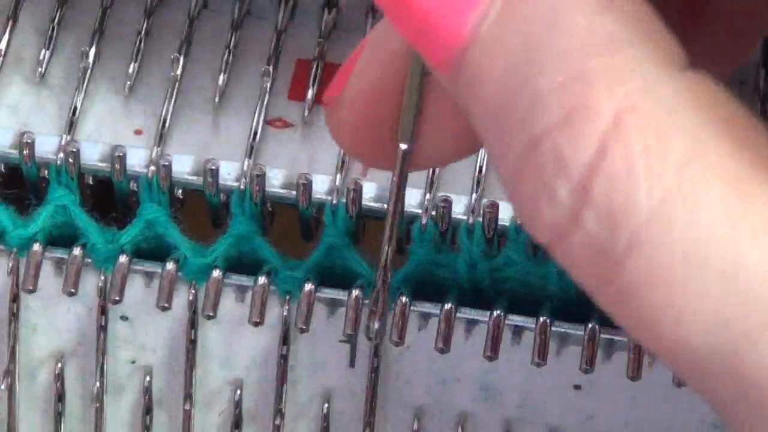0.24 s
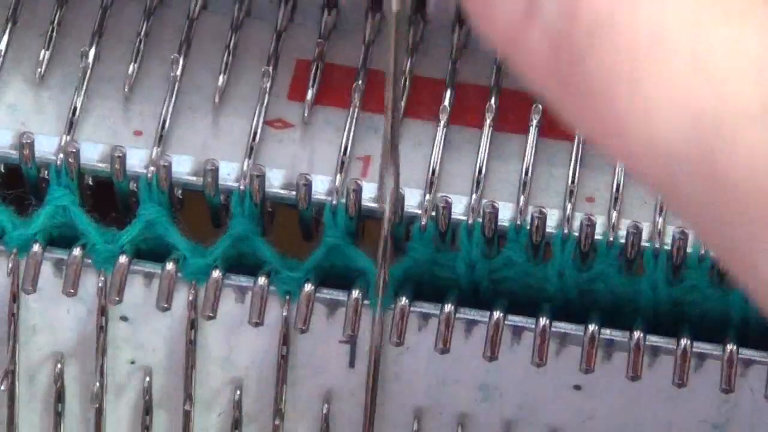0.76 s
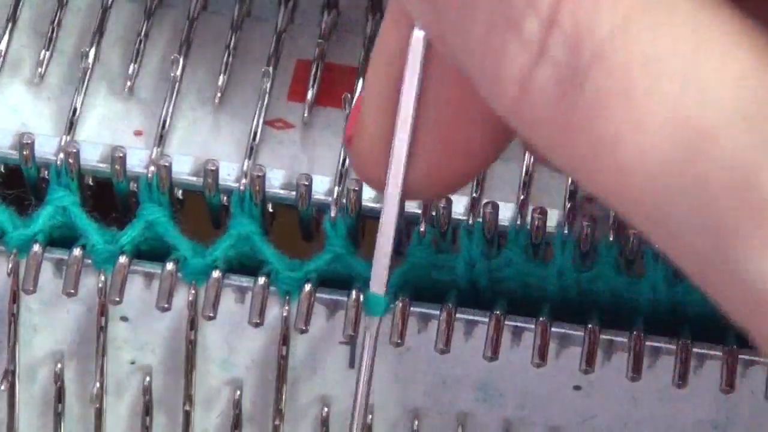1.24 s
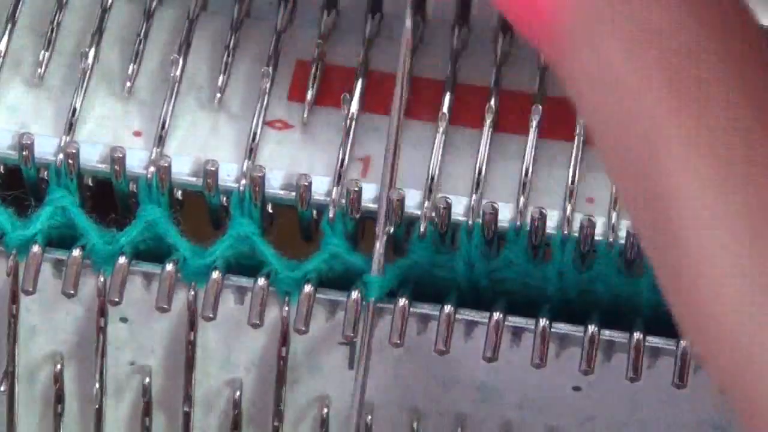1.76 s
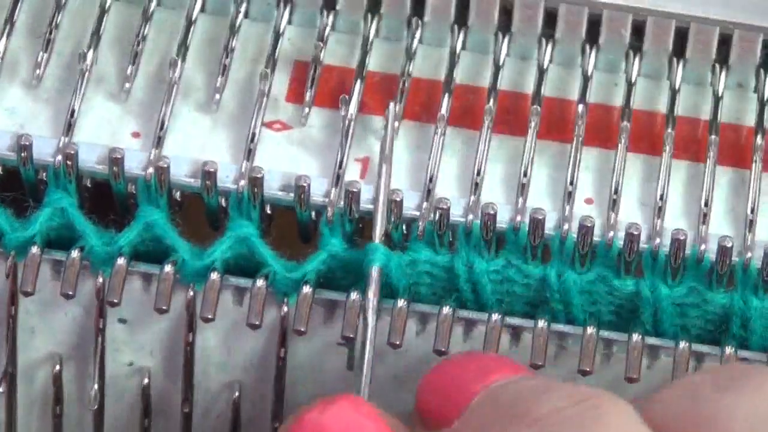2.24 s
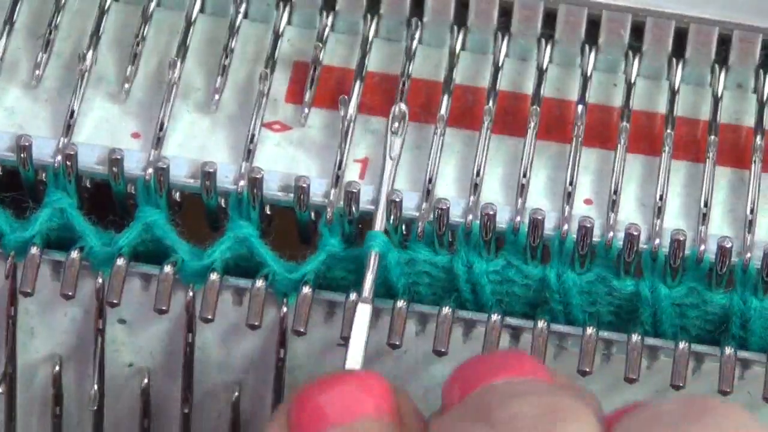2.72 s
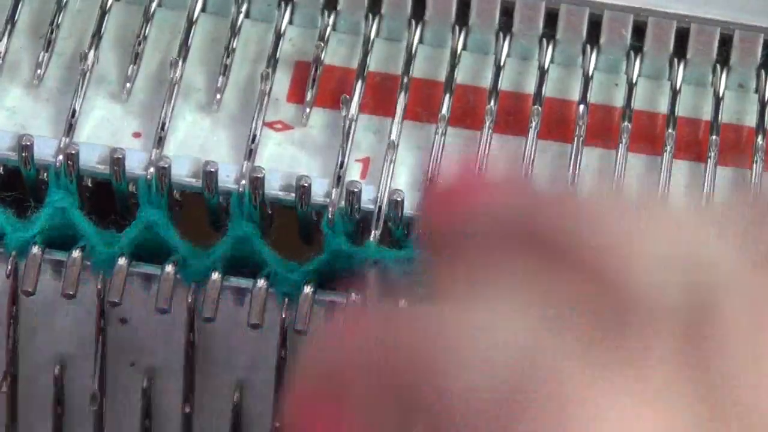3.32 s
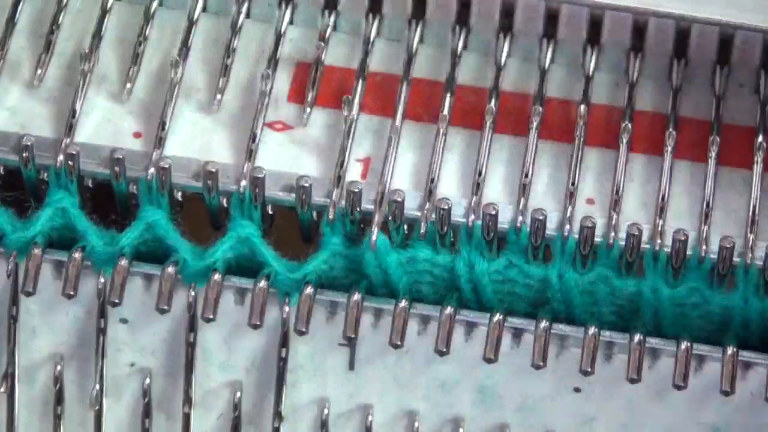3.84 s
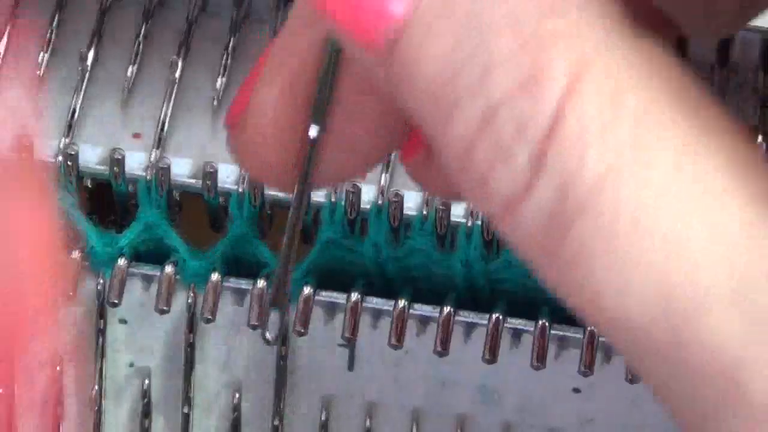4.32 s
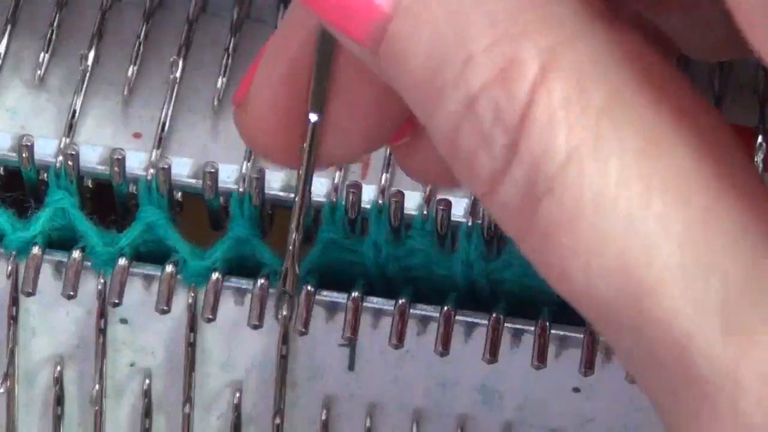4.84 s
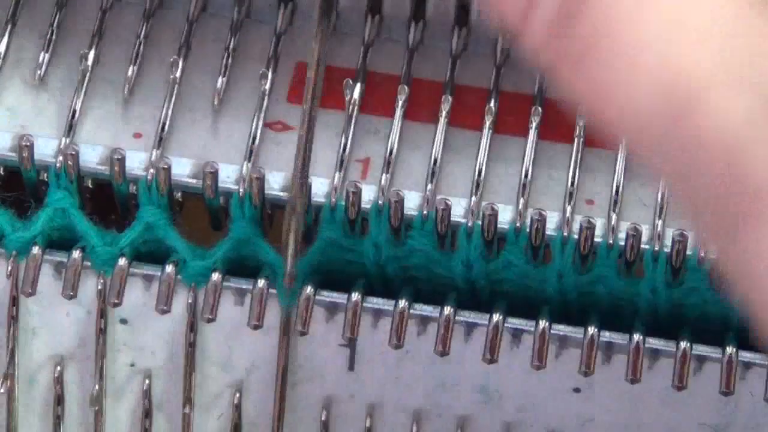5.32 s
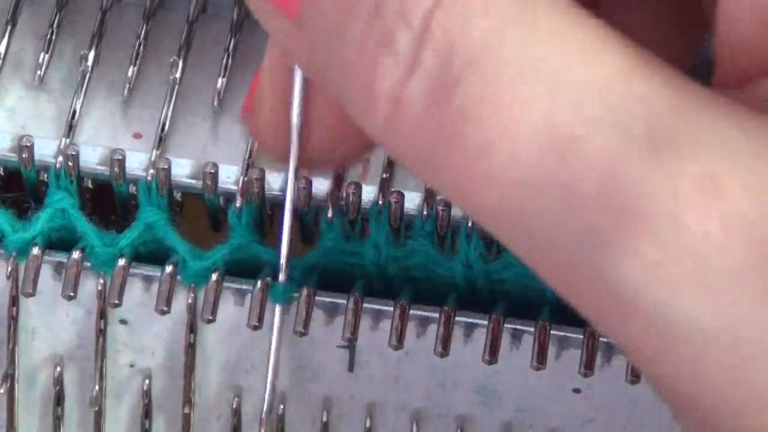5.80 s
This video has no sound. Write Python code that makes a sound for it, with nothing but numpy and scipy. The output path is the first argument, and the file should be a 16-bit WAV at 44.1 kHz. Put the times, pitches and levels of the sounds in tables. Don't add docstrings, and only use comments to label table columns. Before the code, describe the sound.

Close, dry steel clicks with brief ringing and dull plate knocks, scattered unevenly above a soft camera hum, rapid motor flutter and hiss.

```python
import sys
import numpy as np
from scipy import signal
from scipy.fft import rfft, irfft
from scipy.io import wavfile
from scipy.ndimage import uniform_filter1d

SR = 44100
rng = np.random.default_rng(int(sys.argv[2]) if len(sys.argv) > 2 else 0)


def elevation(decibels):
    levels = np.asarray(decibels, float)
    return 10 ** (levels / 20)


def inscribe(sig):
    pcm = np.round(np.clip(np.atleast_2d(sig).T, -1, 1) * 32767)
    wavfile.write(sys.argv[1], SR, pcm.astype(np.int16))


N = 267246

# time in seconds, rumble in dB, casing hum in dB, sliding in dB.
DRIFT = [(0.0, -63, -58, -66), (0.42, -66, -56, -65), (0.61, -58, -56, -56), (0.81, -65, -54, -56),
         (0.96, -64, -56, -58), (1.2, -87, -57.5, -69), (1.42, -56, -50.5, -62), (1.6, -59.5, -54, -65),
         (1.87, -63, -55.5, -69), (2.58, -70, -51.5, -71), (2.79, -85, -59, -69.5), (3.14, -68, -53.5, -75),
         (3.31, -85, -59, -75), (3.51, -67, -59, -64), (3.66, -57, -52.5, -67), (4.12, -67.5, -52.5, -66),
         (4.46, -56, -54, -64), (4.57, -67, -54.5, -69), (4.79, -88, -54.5, -73), (5.08, -71, -54, -62),
         (5.26, -60.5, -52, -57), (5.7, -59, -51.5, -64), (5.96, -65, -57.5, -63), (6.06, -75, -53, -69)]


def on_log(table, hz):
    table_hz, value = np.transpose(table)
    return np.interp(np.log(np.maximum(hz, 1)), np.log(table_hz), value)


def colour(x, table):
    gain = elevation(on_log(table, np.fft.rfftfreq(len(x), 1 / SR)))
    return irfft(rfft(x) * gain, len(x))


def band(hz, width_hz):
    f = np.fft.rfftfreq(N, 1 / SR)
    resonance = 1 / (1 + (2 * (f - hz) / width_hz) ** 2)
    y = irfft(rfft(rng.standard_normal(N)) * resonance, N)
    return y / y.std()


def walk(rate_hz):
    hold = int(SR / rate_hz)
    held = np.repeat(rng.standard_normal(N // hold + 1), hold)
    return 2.5 * uniform_filter1d(uniform_filter1d(held, hold), hold)[:N]


def drift_db(column):
    columns = np.transpose(DRIFT)
    return np.interp(np.arange(N) / SR, columns[0], columns[column])


def ring(modes, t):
    hz, db, t60_s = np.transpose(modes)[:, :, None]
    return (elevation(db) * np.sin(2 * np.pi * hz * t) * 1000 ** (-t / t60_s)).sum(axis=0)


def swell(t, rise_s):
    return 1 - np.exp(-t / rise_s)


def peak(x):
    return x / np.abs(x).max()


def burst(t, rise_s, t60_s, spectrum):
    lead = SR // 200
    x = rng.standard_normal(len(t)) * swell(t, rise_s) * 1000 ** (-t / t60_s)
    coloured = colour(np.pad(x, lead), spectrum)
    return peak(coloured[lead - 8:lead - 8 + len(t)])


def bump(hz, ratio):
    return [(hz / ratio ** 4, -40), (hz / ratio, -8), (hz, 0), (hz * ratio, -8), (hz * ratio ** 4, -40)]


def add(out, start_s, sound):
    i = int(start_s * SR)
    out[i:i + len(sound)] += sound[:N - i]


def casing_hum():
    # centre in Hz, width in Hz, mid in dB, side in dB.
    casing = [(49.4, 9.2, -71, -104), (302, 95, -78.5, -87), (667, 47, -68.5, -85),
              (896.7, 107, -59, -68.5), (1101, 89, -61.5, -68), (1170, 134, -65.5, -71),
              (1237, 45, -61, -88), (1430, 130, -69.5, -87), (1700, 140, -89, -79), (2100, 120, -72.5, -99)]
    hum_db = drift_db(2)
    out = np.zeros((2, N))
    for hz, width_hz, mid_db, side_db in casing:
        sway_db = 0.48 * (hum_db - hum_db.mean()) + 1.26 * walk(5.3)
        own = band(hz, width_hz)
        lean = 0.58 * np.sign(hz - 100)
        side = lean * own + 0.61 * band(hz, width_hz)
        out += elevation(sway_db) * np.array([elevation(mid_db) * own, elevation(side_db) * side])
    return out


def lens_motor():
    # mode in Hz, level in dB, t60 in seconds.
    motor = [(2580, -63.5, 0.074), (2860, -55.5, 0.035), (3360, -57.5, 0.033), (3870, -54.5, 0.026),
             (5120, -61, 0.069), (5350, -57.5, 0.043), (7810, -71, .3)]
    step_hz, first_s, return_db = 25, 0.0232, -7
    out = np.zeros((2, N))
    step = ring(motor, np.arange(SR // 12) / SR)
    for k in range(int(N / SR * step_hz * 2)):
        start_s = first_s + (k - 1) / step_hz / 2
        mid_db = 3.3 * rng.standard_normal() + return_db * (2 - k % 2)
        side_db = 2 + return_db * (4.5 - k % 2)
        add(out[0], start_s, step * elevation(mid_db))
        add(out[1], start_s, step * elevation(side_db))
    return out


def hiss():
    # frequency in Hz, level in dB per Hz.
    hiss_mid = [(30, -10), (60, -0.5), (150, 2), (500, 0.5), (1500, 4), (2400, -3.5), (4000, -4.5),
                (6000, -6), (7000, -10.5), (10000, -9), (13000, -12.5), (15700, -11), (16050, -14),
                (16300, -60)]
    # frequency in Hz, level in dB per Hz.
    hiss_side = [(30, 7), (150, -2), (500, -6.5), (1500, -13), (2200, -13), (4000, -29), (6000, -17),
                 (8000, -15.5), (10000, -28), (15500, -42.5)]
    noise = np.array([colour(rng.standard_normal(N), hiss_mid), colour(rng.standard_normal(N), hiss_side)])
    return noise / noise[0].std() * elevation(-56.5 + 0.5 * walk(3.93))


def rumble():
    return elevation(drift_db(1) - 4) * band(296, 270)


def sliding():
    return elevation(drift_db(3) - 8 + 2.0 * walk(40)) * band(8300, 7500)


def ticks():
    # start in seconds, peak in dB, latch ring in Hz, shank minus latch in dB,
    # shank ring in Hz, contact in ms.
    contacts = [(0.0644, -53, 7810, 2, 3820, 1.2), (0.116, -40.5, 10800, -14, 2390, 2),
                (0.225, -35, 11300, -5, 5700, 0.89), (0.2979, -31, 12300, -15, 3270, 0.8),
                (0.412, -41, 11900, -10, 4030, 1.8), (0.4234, -42, 11700, -14, 5340, 1.5),
                (0.4604, -34, 9400, -9, 4670, 2), (0.464, -32, 9880, -2.5, 5840, 1.2),
                (0.4687, -25, 10100, -19, 5790, 1.1), (0.4766, -36, 9960, -8, 3990, 1.4),
                (0.5084, -36, 9240, -17, 4020, 1.2), (0.5156, -38, 9700, -7, 3100, 1.2),
                (0.577, -39, 10700, -6, 4100, 1.2), (0.6005, -33.5, 9650, 6.5, 2870, 1.6),
                (0.6164, -39, 8400, -13, 2320, 0.82), (0.6434, -32.5, 7550, -4, 4800, 1.2),
                (0.6615, -16, 9650, -5, 3030, 1.4), (0.7444, -54, 9820, 1, 2870, 1.2),
                (0.7966, -40, 6540, -6, 5670, 2.2), (0.7987, -31, 11300, -24, 5580, 1.2),
                (0.8703, -16, 9600, -35, 4840, 1.65), (0.9239, -23.5, 9700, -1, 3020, 1.3),
                (0.9607, -31.5, 10100, -5, 4300, 1.4), (0.977, -34.5, 10500, -8, 2340, 1.1),
                (1.0094, -51, 8950, -10, 2220, 1.2), (1.044, -36.5, 9150, -9, 2980, 2.2),
                (1.1453, -45, 10200, -12, 2940, 1.2), (1.405, -8, 8280, -14, 4760, 1.07),
                (1.7404, -36.5, 11300, -21, 2320, 1.5), (2.053, -38, 10900, -25, 5120, 1.2),
                (2.089, -50, 11200, -8, 3410, 0.97), (2.1125, -29.5, 9400, -6, 2950, 1.2),
                (2.1284, -24.5, 9800, -7.5, 3130, 2.2), (2.38, -44, 10700, -20, 2830, 1.2),
                (2.4187, -34, 10400, -21, 3830, 1.1), (2.4934, -30.5, 11200, -13, 4000, 1.8),
                (2.5701, -49, 10200, -6, 2740, 1.2), (2.6798, -47, 11000, -13, 5130, 1.2),
                (2.7397, -49, 10600, -11, 2520, 1.3), (2.9133, -43.5, 9200, -21, 3590, 1.6),
                (2.9908, -47.5, 8860, 7, 3600, 1.8), (3.042, -38.5, 11700, 7.5, 2740, 1.25),
                (3.0467, -40, 10400, -3, 2940, 1), (3.107, -42, 10300, -8, 3180, 1.2),
                (3.1353, -33.5, 10200, -8, 3100, 1.8), (3.1892, -36, 11500, -16, 4520, 1.2),
                (3.2158, -30.5, 10100, -28, 4540, 2.5), (3.4685, -21, 10050, -6, 3700, 0.54),
                (3.4898, -41, 10200, -1.5, 4100, 1.4), (3.5289, -26.5, 7500, -7, 3700, 1.54),
                (3.5496, -43, 8230, -2, 2740, 1.3), (3.8417, -42, 11400, -10, 3330, 1.2),
                (3.9085, -39, 10500, -17, 3400, 1.2), (3.9394, -45, 9820, -7, 3800, 1.2),
                (4.014, -37.5, 11600, -22, 4480, 0.89), (4.133, -45, 8890, -3, 3310, 1.2),
                (4.48, -33, 11500, -26, 4790, 0.77), (4.6583, -29.5, 9430, -8, 3940, 1.4),
                (4.729, -25.5, 10900, -25, 4900, 0.86), (5.016, -30.5, 9300, -6, 3730, 1.26),
                (5.0794, -45, 9170, -8, 3370, 1.2), (5.1253, -25.5, 9500, 1, 2300, 0.91),
                (5.154, -27.5, 10800, 4.5, 4000, 0.57), (5.1661, -13.5, 9940, -4, 3055, 0.99),
                (5.309, -43.5, 10800, -4, 3800, 1.5), (5.3228, -33, 11600, -16, 3290, 1.2),
                (5.4047, -12, 10400, -10, 4850, 0.94), (5.435, -25, 12200, -16, 3330, 1.6),
                (5.451, -24, 9100, -4.5, 3140, 1.4), (5.491, -34, 11800, -8, 4380, 1.2),
                (5.5017, -35.5, 12000, -14, 4500, 1.2), (5.558, -39, 11700, -11, 3820, 1.5),
                (5.7177, -27, 9900, -6.5, 4470, 1.4), (5.7684, -47, 7330, -7, 2830, 1.3),
                (5.886, -45, 6660, 0, 4790, 1.6), (5.9379, -48, 10600, -6, 4030, 1.4)]
    # frequency in Hz, level in dB per Hz.
    crack_spectrum = [(1470, -32), (2500, -7.5), (3130, -13.5), (4330, 2), (6450, -2), (9770, -2),
                      (13700, -9.5), (15100, -9), (16800, -35)]
    out, t = np.zeros(N), np.arange(SR // 5) / SR
    for start_s, db, latch_hz, shank_db, shank_hz, contact_ms in contacts:
        contact_s = contact_ms / 1000
        crack = burst(t, contact_s / 4, 6 * contact_s, crack_spectrum)
        rattle = burst(t, 0.0013, 0.057, crack_spectrum)
        latch = burst(t, contact_s / 4, 9 * contact_s, bump(latch_hz, 1.12))
        shank = burst(t, contact_s / 4, 16 * contact_s, bump(shank_hz, 1.19))
        tick = elevation(-3) * crack + elevation(-12) * rattle + elevation(-5) * latch + elevation(shank_db) * shank
        add(out, start_s, elevation(db) * tick)
    return out


def needle_sings():
    # start in seconds, level in dB, mode in Hz, t60 in seconds.
    songs = [(.412, -54, 4050, .1), (.424, -48, 11900, 0.086), (.601, -36, 3110, 0.055),
             (0.873, -42, 10170, .15), (.924, -32, 3153, .08), (1.405, -32, 4876, 0.098),
             (1.404, -31, 4440, 0.14), (2.128, -38, 3144, 0.084), (2.497, -50, 4380, 0.21),
             (2.496, -42, 11600, 0.089), (3.043, -43, 2700, 0.057), (3.044, -47, 5970, 0.063),
             (3.136, -40.5, 3130, 0.064), (3.19, -48, 11800, 0.069), (3.217, -43, 11840, 0.077),
             (3.865, -54, 2870, .06), (5.403, -43.5, 4450, .2), (5.435, -39, 12100, 0.12),
             (5.436, -40, 9300, 0.07), (5.451, -39.5, 3170, 0.086), (5.491, -50.5, 11800, 0.19),
             (5.585, -51.5, 2900, .06)]
    out, t = np.zeros(N), np.arange(SR // 5) / SR
    for start_s, db, hz, t60_s in songs:
        pair = ring([(hz, db, t60_s), (hz * 1.015, db - 12, 0.84 * t60_s)], t)
        add(out, start_s, pair * swell(t, 0.0023))
    return out


def plate_knocks():
    # start in seconds, peak in dB, main ring in Hz, upper minus lower in dB, t60 in seconds.
    blows = [(0.465, -42, 892, 4.5, 0.2), (0.6, -34.5, 907, 4.5, 0.21), (0.661, -38.5, 962, 7, 0.16),
             (0.87, -45, 1174, -3, 0.18), (0.923, -31, 739, -6, 0.17), (1.044, -45.5, 1166, -0.5, 0.22),
             (1.405, -27, 1170, -4.5, 0.15), (2.127, -45.5, 720, 1.5, 0.18), (3.041, -45.5, 812, -13, 0.23),
             (3.466, -39.5, 690, 4.5, 0.26), (3.527, -42, 1180, 0, 0.16), (5.014, -41.5, 1170, 4, 0.23),
             (5.124, -30, 848, 0.5, 0.13), (5.165, -33, 958, 4.5, 0.15), (5.402, -45, 948, -7, 0.22),
             (5.451, -30, 739, -2.5, 0.17), (5.716, -44, 1267, -1, 0.37), (5.886, -43.5, 952, -9, 0.28)]
    # frequency in Hz, level in dB per Hz.
    plate_lower = [(88, -38), (150, -16), (551, -9), (742, 0.5), (818, -2), (991, -8), (1180, -0.5),
                   (1320, -19.5), (1500, -9.5), (1950, -51), (3300, -120)]
    # frequency in Hz, level in dB per Hz.
    plate_upper = [(900, -40), (1300, -7), (1600, 1), (2100, -6), (2600, -5), (3500, -27)]
    out, t = np.zeros(N), np.arange(SR // 2) / SR
    for start_s, db, hz, upper_db, t60_s in blows:
        main = ring([(hz, 0, t60_s), (hz * 1.07, -5, t60_s)], t) * swell(t, 0.0039)
        dense = burst(t, 0.0046, 1.07 * t60_s, plate_lower)
        upper = burst(t, 0.00022, 0.029, plate_upper)
        upper += elevation(-7.5) * burst(t, 0.0012, 0.18, plate_upper)
        add(out, start_s, elevation(db + 0.5) * (elevation(-9) * peak(main) + dense + elevation(upper_db + 1) * upper))
    return out


def table_thumps():
    # start in seconds, level in dB, mode in Hz, t60 in seconds.
    thumps = [
        (0.609, -57, 120.4, 0.34),
        (.94, -51.5, 104.6, .5),
        (1.42, -55, 111, .4),
        (3.52, -56, 110, 0.46),
        (5.161, -52, 159.8, 0.49),
        (5.47, -54.5, 106, 0.57),
    ]
    out, t = np.zeros(N), np.arange(SR // 2) / SR
    for start_s, db, hz, t60_s in thumps:
        add(out, start_s, ring([(hz, db, t60_s)], t) * swell(t, 0.015))
    return out


def room(x):
    # frequency in Hz, t60 in seconds.
    room_t60 = [(200, 0.8), (700, 0.2), (2000, .2), (5000, 0.21), (10000, .17), (16000, .12)]
    t, tail = np.arange(SR // 2) / SR, 0
    for hz in 150 * 2 ** np.arange(0, 7, 0.5):
        noise = np.array([band(hz, hz / 2)[:len(t)], band(hz, hz / 2)[:len(t)]])
        tail = tail + noise * np.sqrt(hz) * 1000 ** (-t / on_log(room_t60, hz))
    tail = tail * swell(t, 0.00087)
    tail /= np.sqrt((tail[0] ** 2).sum())
    return elevation(-13) * signal.fftconvolve(x[None], tail, axes=1)[:, :N]


def scene():
    # frequency in Hz, level in dB.
    ports = [(300, -17.5), (1000, -16.5), (2500, -19), (4000, -23), (8000, -11.5), (11000, -20.5),
             (16000, -22)]
    camera = casing_hum() + lens_motor() + hiss()
    close = ticks() + needle_sings() + plate_knocks() + table_thumps()
    wet = room(close)
    mid = camera[0] + rumble() + sliding() + close + wet[0]
    side = camera[1] + colour(np.roll(close, 3) + wet[1], ports)
    return np.array([mid + side, mid - side])


def low_pass(x):
    return signal.sosfilt(signal.butter(12, 17150, fs=SR, output="sos"), x)


def record(dry):
    return low_pass(dry)


dry = scene()
out = record(dry)
inscribe(out)
```